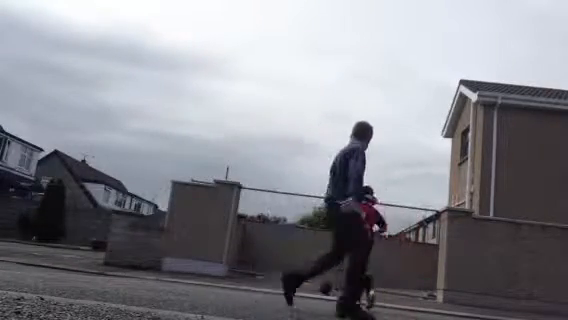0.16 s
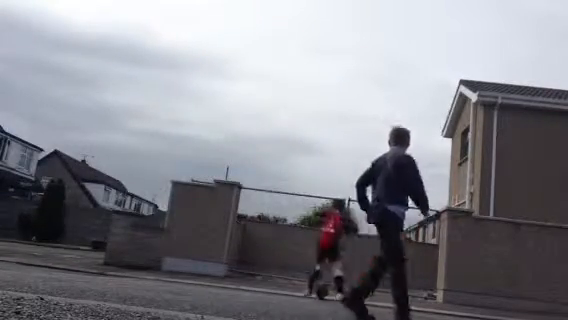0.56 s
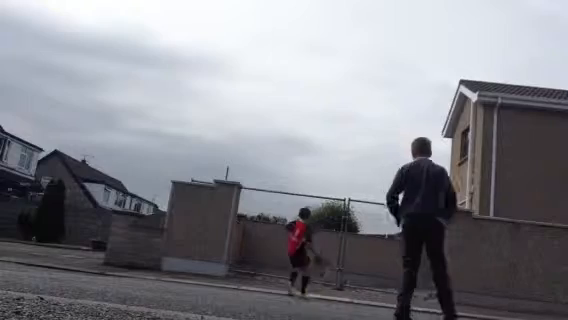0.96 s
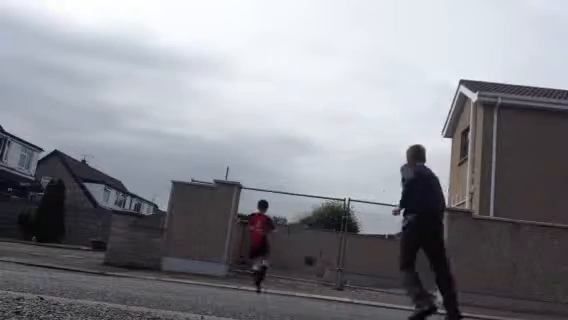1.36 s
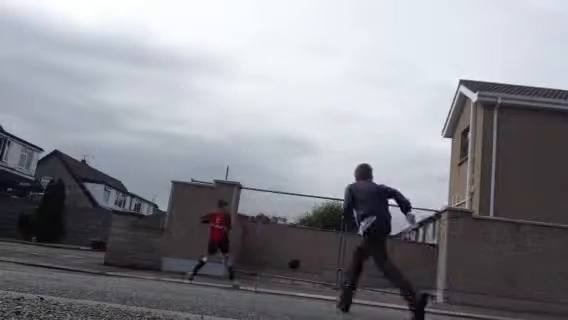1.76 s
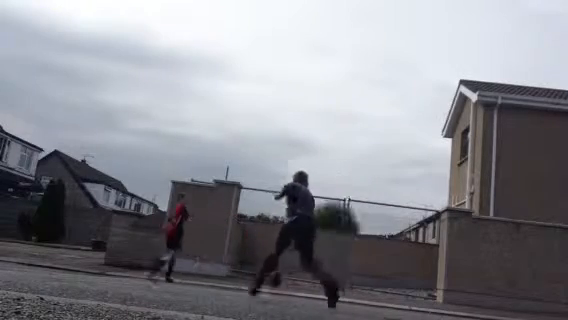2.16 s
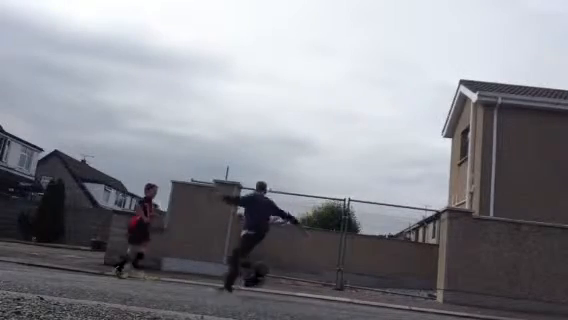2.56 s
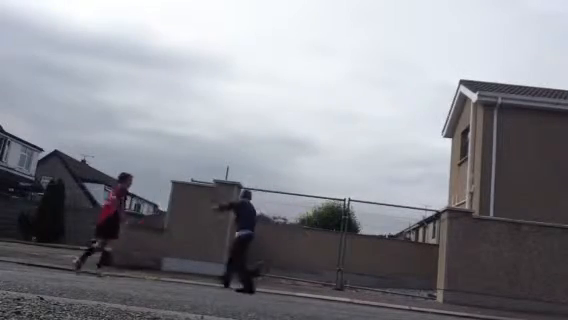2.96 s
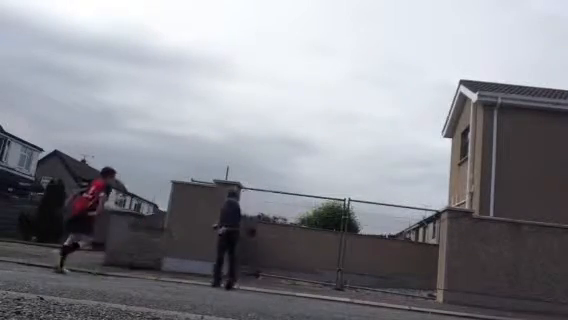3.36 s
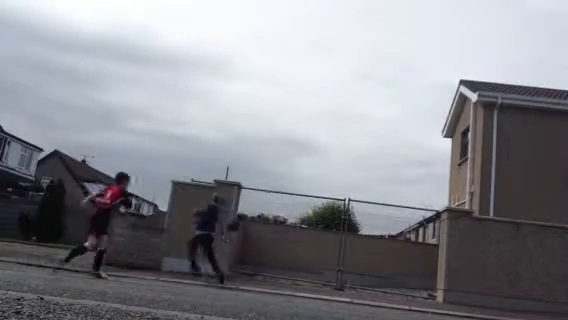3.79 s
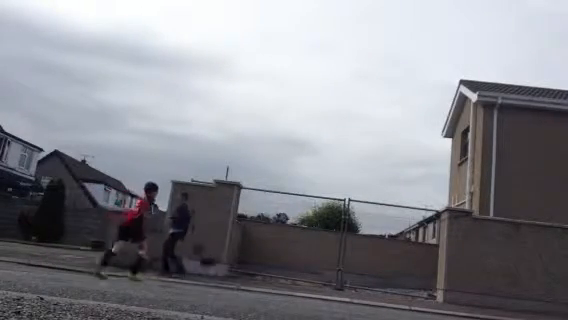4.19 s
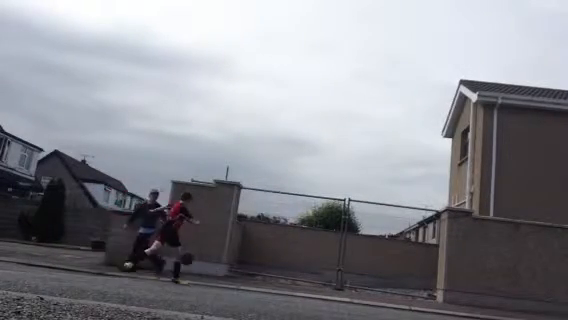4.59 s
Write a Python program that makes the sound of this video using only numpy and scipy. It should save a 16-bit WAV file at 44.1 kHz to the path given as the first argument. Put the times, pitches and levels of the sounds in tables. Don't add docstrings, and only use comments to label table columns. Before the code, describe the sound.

Outdoors on a residential street, soft footfalls and a faint fence tremble lead to a sharp football kick. The ball hits a loose wire fence, which bursts into bright, hissing rattle. More bounces and a heavier, hollow kick follow, then a second, longer rattle with clustered slaps. A small microphone catches light wind and distant traffic.

```python
import sys
import numpy as np
from scipy import signal
from scipy.fft import rfft, irfft
from scipy.io import wavfile
from scipy.ndimage import uniform_filter1d

SR = 44100
rng = np.random.default_rng(int(sys.argv[2]) if len(sys.argv) > 2 else 0)


def how_loud(loudness_db):
    steps = np.asarray(loudness_db, float) / 20
    return 10 ** steps


def generate_wav(sig):
    pcm = np.round(np.clip(np.atleast_2d(sig).T, -1, 1) * 32767).astype(np.int16)
    wavfile.write(sys.argv[1], SR, pcm)


N = 208725
TIME = np.arange(N) / SR


def rms_one(x):
    return x / np.sqrt(np.mean(x ** 2) + 1e-20)


def coloured(x, spectrum):
    hz, db = np.transpose(spectrum)
    grid = np.arange(N // 2 + 1) * SR / N + 1
    gain = how_loud(np.interp(np.log(grid), np.log(hz), db))
    return rms_one(irfft(rfft(x) * gain, N))


def drift(rate_hz):
    pole = np.exp(-2 * np.pi * rate_hz / SR)
    noise = rng.standard_normal(N + SR)
    return rms_one(signal.lfilter([1], [1, -2 * pole, pole * pole], noise)[SR:])


def bandpass(x, low_hz, high_hz):
    return signal.sosfilt(signal.butter(2, [low_hz, high_hz], "band", fs=SR, output="sos"), x)


def ring(clicks, hz, t60):
    radius, angle = how_loud(-60 / (t60 * SR)), 2 * np.pi * hz / SR
    feedback = [1, -2 * radius * np.cos(angle), radius * radius]
    return signal.lfilter([0, np.sin(angle)], feedback, clicks + 1e-18)


def add(track, s, sound):
    i = int(s * SR)
    track[i:i + len(sound)] += sound[:N - i]


def shaking():
    # start in seconds, wire ring in dB, swell in seconds,
    # decay in dB per second, lift of the top mode in dB.
    fence_hits = [
        (-.25, -34, .05, 26.5, 6),
        (1.214, -18, 0.075, 24.5, 11.5),
        (3.27, -26, 0.075, 13.5, 9.5),
    ]
    linger_db, linger_db_per_s = -16, 6
    rest_db = -53
    top_rise_s, top_fade_s, top_db = .018, .65, -4.5
    clatter_db, clatter_db_per_ring_db = .4, -0.049
    power, top_lift_db = how_loud(2 * rest_db), np.zeros(N)
    for s, db, swell_s, dying_db_per_s, lift_db in fence_hits:
        age = np.maximum(TIME - s, 0)
        decay = how_loud(-2 * dying_db_per_s * age) + how_loud(2 * (linger_db - linger_db_per_s * age))
        power = power + how_loud(2 * db) * (1 - np.exp(-age / swell_s)) ** 2 * decay
        lift = lift_db * (1 - np.exp(-age / top_rise_s)) * np.exp(-age / top_fade_s)
        top_lift_db = np.where(age > 0, lift, top_lift_db)
    ring_db = 10 * np.log10(power)
    clatter = clatter_db + clatter_db_per_ring_db * (ring_db - ring_db.mean())
    return ring_db, clatter, top_db + top_lift_db


def panel_slaps():
    # start in seconds, peak in dB, 60 dB decay time in seconds.
    slap_events = [(0.1215, -23, 0.069), (0.214, -23.5, 0.11), (0.2454, -25.5, 0.45), (0.7355, -24, 0.04),
                   (1.096, -26, 0.1), (1.236, -11, 0.58), (1.303, -15, 0.1), (1.3599, -5.5, 0.068),
                   (1.559, -14, 0.33), (1.7984, -13, 0.089), (2.3106, -27, 0.072), (2.3989, -15, 0.18),
                   (3.181, -25, 0.085), (3.2776, -8.5, 0.15), (3.305, -11, 0.2), (3.3594, -17, .074),
                   (3.3698, -10, 0.034), (3.416, -13, 0.082), (3.4291, -4.5, 0.073), (3.4755, -7, 0.17),
                   (3.55, -22, 0.059), (3.675, -15, .04), (3.6858, -15, 0.088), (3.746, -9, 0.2),
                   (3.8754, -11, 0.08), (4.0587, -16, 0.1), (4.069, -16, 0.11), (4.1926, -14, 0.15),
                   (4.2522, -19, 0.071), (4.341, -21, 0.073)]
    slaps = np.zeros(N)
    for s, db, t60 in slap_events:
        tick = how_loud(5 - 60 * TIME / 0.0083)
        add(slaps, s, how_loud(db - 20.0) * (how_loud(-60 * TIME / t60) + tick))
    return slaps


def wire_ticks(per_s=7000., size_db=1.0):
    happens = rng.random(N) < per_s / SR
    size = how_loud(size_db * np.minimum(rng.exponential(1, N), 5))
    return rms_one(happens * size * rng.choice([-1, 1], N))


def wire_ring(drive, top_db, count=18):
    # frequency in Hz, spread between spans from 0 to 1,
    # level in dB, 60 dB decay time in seconds.
    wire_modes = [(2249, 0.03, -3.0, 0.27), (3760, .03, -41, 0.093), (6376, 0.03, 2.5, 0.13),
                  (12280, 0.05, 2.5, 0.026)]
    span, place = rng.integers(0, count, N), np.linspace(-1, 1, count)
    length = 0.395 * place + 0.708 * place ** 3 + .15 * place ** 2
    wires = np.zeros(N)
    for hz, spread, db, t60 in wire_modes:
        level = how_loud(db) * np.sqrt(0.056 / t60)
        push = drive * (how_loud(top_db) if hz > 9000 else 1)
        for k in range(count):
            wires += level * ring(push * (span == k), hz * (1 + spread * length[k]), t60)
    return wires


def fence():
    # frequency in Hz, level in dB per Hz.
    clatter_spectrum = [(300, -14.5), (600, -2.5), (760, -14), (1100, -4), (2500, 2.5), (4000, -1.5),
                        (5200, -11), (7000, 6), (9500, 0.5), (12500, 3), (13500, 1), (14900, -0.5),
                        (16000, -7)]
    ring_db, clatter_db, top_db = shaking()
    sway, slaps, ticks = how_loud(ring_db + drift(11.0)), panel_slaps(), wire_ticks()
    shake = sway + slaps
    wires = wire_ring(ticks * shake, top_db)
    frame = sway + 0.12 * uniform_filter1d(slaps, size=900)
    lag = np.exp(-1 / (0.02 * SR))
    frame = signal.lfilter([1 - lag], [1, -lag], frame, zi=[lag * frame[0]])[0]
    low = coloured(ticks * frame, clatter_spectrum[:7] + [(7000, -48)])
    low *= np.sqrt(np.mean(frame ** 2))
    high = coloured(ticks * shake, [(4000, -33.0)] + clatter_spectrum[6:])
    high *= np.sqrt(np.mean(shake ** 2))
    return how_loud(-26.0) * wires + how_loud(clatter_db) * (how_loud(-6.0) * low + how_loud(-2.5) * high)


def knocks(contact_s=.00006, crack_db=2.0, crack_t60=0.008):
    # start in seconds, level in dB,
    # weight in dB, hollowness in dB, hardness in dB.
    blow_events = [(.5930, -36, -14, -6, -22), (.7900, -34, 2, -4, -8), (0.9041, -10, -3, -10, -10),
                   (0.9194, -36, 3, -3, -14), (0.978, -36, 9, 0, -10), (1.2150, -18, -5, 7, -29),
                   (1.2698, -19.5, -8, 0, -21), (1.4520, -37, -7, 5, -3), (1.6644, -20, -4, -6, -8),
                   (2.2245, -18.5, -25, -9, -21), (2.2290, -32, -15, 0, -12), (2.307, -31, -5, 10, -11),
                   (2.7326, -21, -10, -13, -3), (2.7620, -9.5, 2, 7, -3), (2.8403, -36, 19, 3, 2),
                   (2.8526, -44, 26, 6, -11), (3.166, -26, -10, 1, -8), (3.2690, -30, 3, 10, -12),
                   (3.745, -33, 1, 9, -9), (4.2154, -16, -4, -12, 1), (4.2183, -15.5, -2, 1, -22),
                   (4.2850, -46, 3, 6, -6), (4.6280, -44, 2, 9, -8)]
    # frequency in Hz, decay time as a share of the blow's,
    # level in dB, driving part of the blow (rounded: 0 push, 1 cavity, 2 skin, 3 crack).
    ball_modes = [(288, 1.13, -5, 0.5), (510, 0.85, 0.5, -0.5), (1000, 1.15, -10, 1), (1181, 0.99, -1.5, 2),
                  (1926, 0.68, 0, 2), (3900, 0.17, -30, 3)]
    out, t = np.zeros(N), TIME[:SR // 5]
    pulse = t * np.exp(-t / contact_s)
    contact = -pulse / np.sum(pulse)
    noise = rng.standard_normal((len(blow_events), len(t)))
    noise[:, :3] = -2.5
    detune = rng.normal(1, .02, (len(blow_events), len(ball_modes)))
    for (s, level, weight, hollow, hard), hiss, shift in zip(blow_events, noise, detune):
        t60 = .013 * how_loud(.22 * (hollow - hard))
        levels_db = level + np.array([weight, hollow, 0, hard])
        crack = bandpass(hiss * how_loud(-60 * t / crack_t60), 1800., 6500.)
        blow = how_loud(levels_db[3] + crack_db) * crack
        for (hz, share, db, part), k in zip(ball_modes, shift):
            height = how_loud(db + levels_db[int(round(part))])
            blow += height * ring(contact, hz * k, max(share * t60, .002))
        add(out, s, blow)
    return out


def walls(x, t60=0.64, level_db=-30, cut_hz=1300):
    t = TIME[:SR // 2]
    lumps = how_loud(2 * rng.standard_normal(len(t) // 200 + 1).repeat(200)[:len(t)])
    tail = rng.standard_normal(len(t)) * lumps * how_loud(-60 * t / t60) * (1 - np.exp(-t / 0.002))
    tail = signal.sosfilt(signal.butter(2, cut_hz, fs=SR, output="sos"), tail)
    tail /= np.sqrt(np.sum(tail ** 2))
    return how_loud(level_db) * signal.fftconvolve(x, tail)[:N] * 3.37


def scuffs(grain_db=2.5):
    # start in seconds, level in dB, centre in Hz, 60 dB decay time in seconds.
    scuff_events = [(0.785, -34.5, 1480, 0.033), (.906, -26, 900, 0.087), (0.933, -47, 900, 0.12),
                    (.978, -37, 900, .05), (0.991, -33.5, 3000, 0.083), (1.015, -33.5, 1730, 0.1),
                    (1.215, -25.5, 1370, 0.057), (1.664, -24, 1210, 0.044), (2.227, -23, 1500, 0.026),
                    (2.307, -32, 1180, 0.056), (2.736, -30, 800, 0.044), (2.766, -17.5, 600, 0.084),
                    (2.785, -18.5, 1350, 0.066), (2.86, -33, 774, 0.36), (2.91, -36.5, 1130, 0.25),
                    (3.167, -32.5, 1290, 0.054), (3.268, -31.5, 1000, 0.058), (3.744, -33, 870, 0.19),
                    (4.215, -19, 1900, 0.035), (4.625, -35, 900, 0.061)]
    out, t = np.zeros(N), TIME[:SR // 3]
    noise = rng.standard_normal((len(scuff_events), 2, len(t)))
    for (s, db, hz, t60), (hiss, lumps) in zip(scuff_events, noise):
        grit = hiss * how_loud(grain_db * rms_one(uniform_filter1d(lumps, size=90)))
        grit = rms_one(bandpass(grit, hz / 2, hz * 2))
        swell = 1 - np.exp(-(t / (0.067 * t60)) ** 2)
        add(out, s, how_loud(db - 60 * t / t60) * swell * grit)
    return out


def thuds(rise_cycles=0.32):
    # start in seconds, peak in dB, frequency in Hz.
    thud_events = [(0.1, -42, 269), (0.217, -32.5, 300), (0.236, -40, 226), (0.241, -23, 202),
                   (0.367, -36.5, 248), (0.437, -30.5, 229), (0.456, -31, 143), (0.549, -38, 154),
                   (0.765, -28, 214), (0.77, -28, 210), (0.823, -37, 207), (0.913, -23.5, 560),
                   (0.988, -29.5, 553), (1.114, -20.5, 240), (1.127, -33, 183), (1.153, -23.5, 222),
                   (1.664, -21.5, 286), (1.729, -30.5, 258), (2.441, -37, 158), (2.543, -34.5, 262),
                   (2.654, -40, 161), (2.776, -16, 310), (3.275, -31, 400), (4.222, -23, 216),
                   (4.295, -34, 255), (4.323, -38, 245), (4.487, -36, 155), (4.514, -32.5, 180),
                   (4.539, -34.5, 234), (4.561, -31.5, 221)]
    # start in seconds, peak in dB,
    # frequency in Hz, 60 dB decay time in seconds.
    slow_rings = [
        (.9180, -20.5, 1000, .035),
        (.9195, -30, 1390, 0.016),
        (2.7750, -15.5, 550, 0.018),
        (4.2270, -29, 1070, 0.025),
        (4.2165, -22, 800, .025),
        (1.172, -38, 230, .09),
    ]
    out, t = np.zeros(N), TIME[:SR // 5]
    for s, db, hz, t60 in [(*row, .036) for row in thud_events] + slow_rings:
        swell = how_loud(db + 3.5 - 60 * t / t60) * (1 - np.exp(-t * hz / rise_cycles))
        add(out, s + 0.00074, -swell * np.sin(2 * np.pi * hz * t))
    return out


def street():
    # frequency in Hz, level in dB per Hz.
    hum_spectrum = [(18, -67), (30, -65), (171, -3.5), (226, 1), (260, 4), (345, 1), (574, -2.5),
                    (816, -12.5), (876, -0.5), (2000, -18), (2600, -36), (4400, -120)]
    # time in seconds, level in dB.
    traffic_levels = [(0, -51), (.8, -54), (1.6, -50.5), (2.7, -48), (3.6, -50.5), (4.73, -52)]
    # centre in seconds, level in dB, half length in seconds.
    gust_events = [(0.229, -41.5, .07), (.53, -49.5, 0.13), (.97, -48, 0.22), (1.26, -52, .1),
                   (1.691, -46, .1), (2.753, -49.5, 0.17), (3.283, -57, 0.11), (4.53, -46, 0.087),
                   (.02, -53, .05), (2.43, -57, .06)]
    traffic_db = np.interp(TIME, *np.transpose(traffic_levels))
    hum = coloured(rng.standard_normal(N), hum_spectrum + [(16000, -45)])
    traffic = how_loud(traffic_db + drift(4.4)) * hum
    gusts = sum(how_loud(db) * np.exp(-((TIME - s) / half_s) ** 2) for s, db, half_s in gust_events)
    wind = rms_one(bandpass(rng.standard_normal(N), 70., 130.))
    return traffic + gusts * how_loud(-2.5 + 3.3 * drift(15.0)) * wind


def scene():
    blows = knocks()
    return (fence() + blows + walls(blows) + scuffs() + thuds() + street())[None]


def dropouts(x, depth_db=-55.0, single=0.76):
    # frequency in Hz, share of empty slots from 0 to 1.
    empty_shares = [(12600, .02), (13300, .12), (13700, .4), (14100, .72), (14450, .5), (14900, .18),
                    (15400, .2)]
    hz, _, frames = signal.stft(x, SR, nperseg=1024)
    patches, slots = rng.standard_normal((2,) + frames.shape)
    patches = uniform_filter1d(uniform_filter1d(patches, size=8, axis=2), size=10, axis=1)
    chance = rms_one(patches) + single * uniform_filter1d(slots, size=3, axis=2)
    rank = chance.ravel().argsort().argsort().reshape(frames.shape) / chance.size
    empty = rank < np.interp(hz, *np.transpose(empty_shares), left=0)[:, None]
    gated = frames * np.where(empty, how_loud(depth_db), 1)
    return signal.istft(gated, SR, nperseg=1024)[1][:, :N]


def top_cut(x):
    return signal.sosfilt(signal.butter(12, 15810, fs=SR, output="sos"), x)


def record(dry):
    x = signal.sosfilt(signal.butter(3, 129, "high", fs=SR, output="sos"), dry)
    x = dropouts(x)
    x = signal.sosfilt(signal.ellip(12, .5, 80, 15330, fs=SR, output="sos"), x)
    return top_cut(x)


dry = scene()
out = record(dry)
generate_wav(out)
```